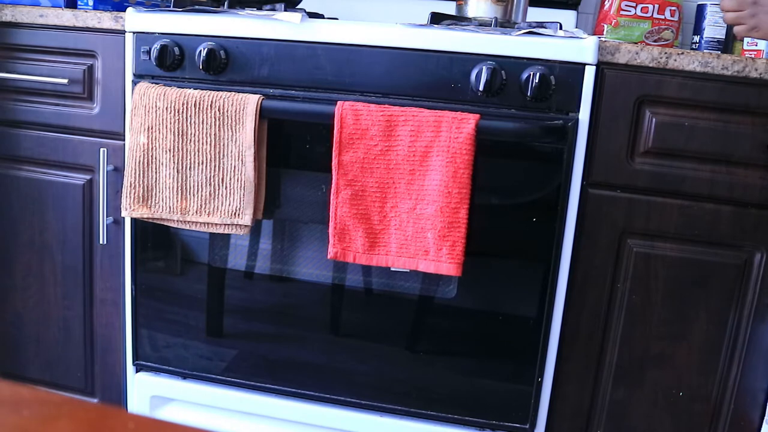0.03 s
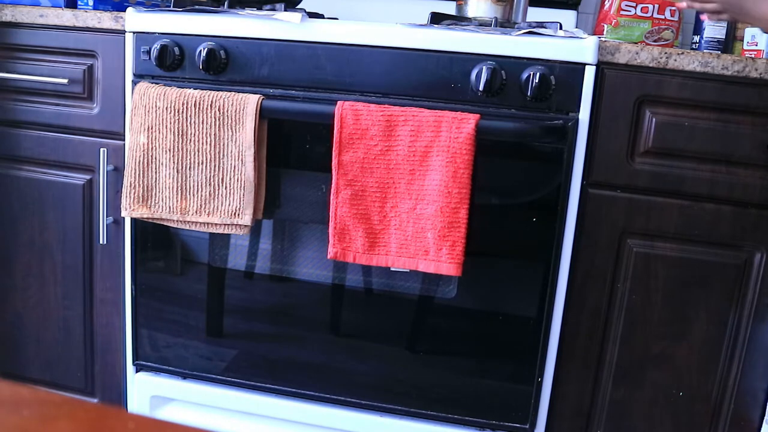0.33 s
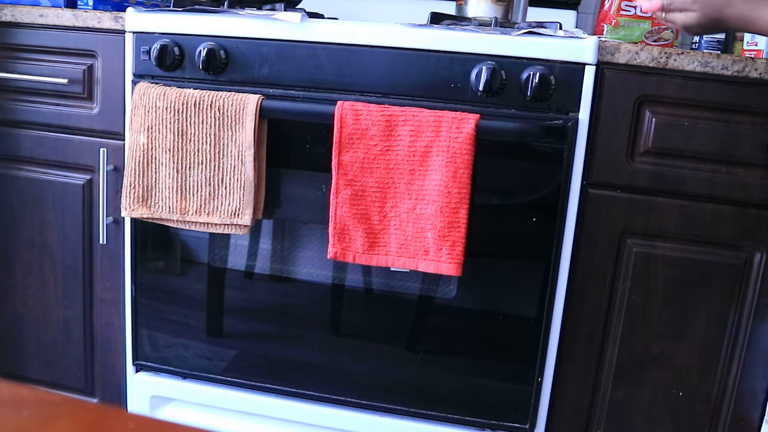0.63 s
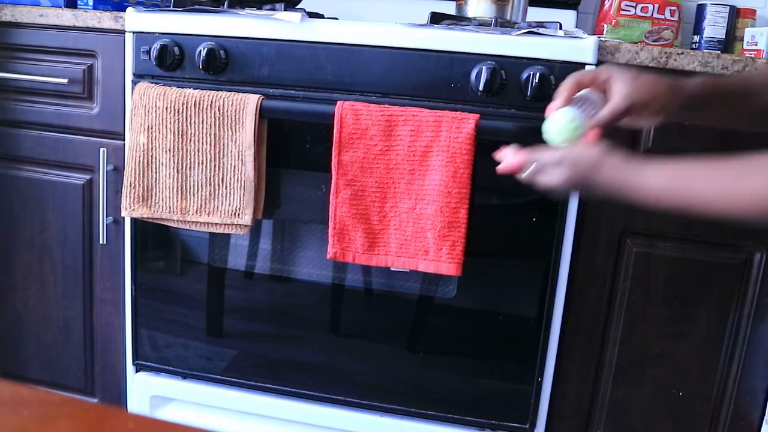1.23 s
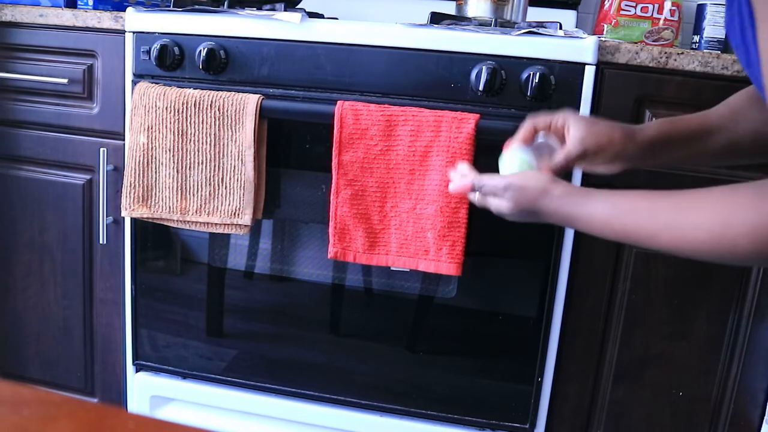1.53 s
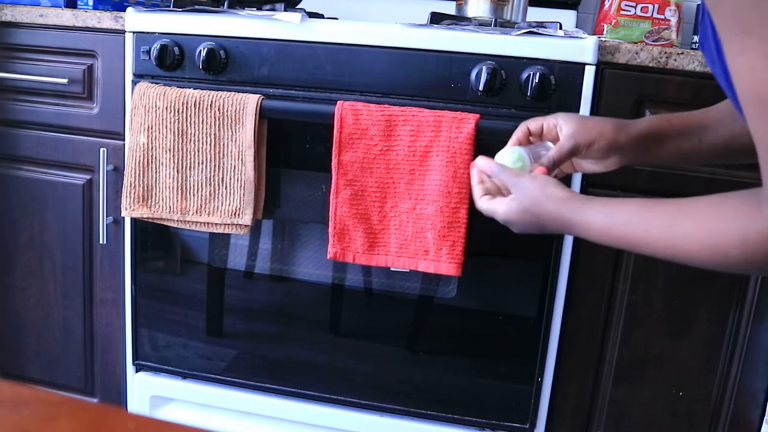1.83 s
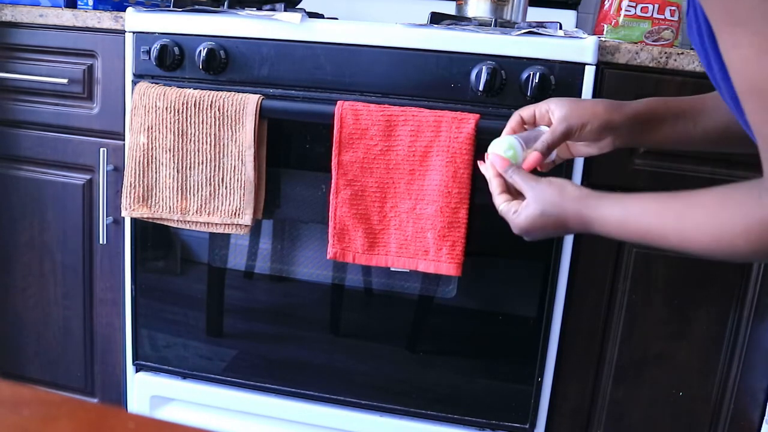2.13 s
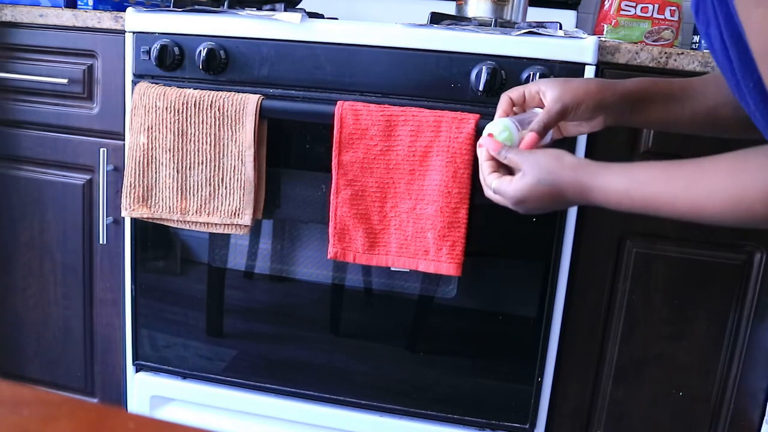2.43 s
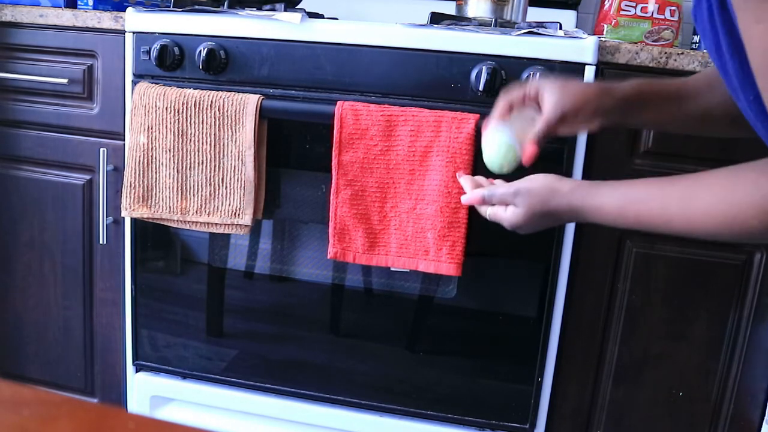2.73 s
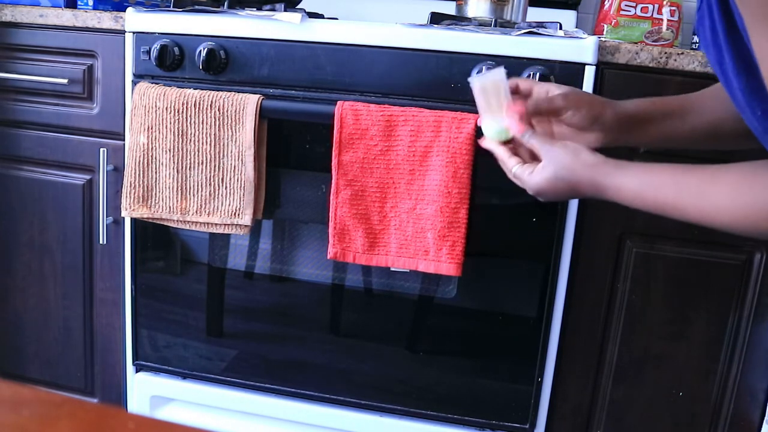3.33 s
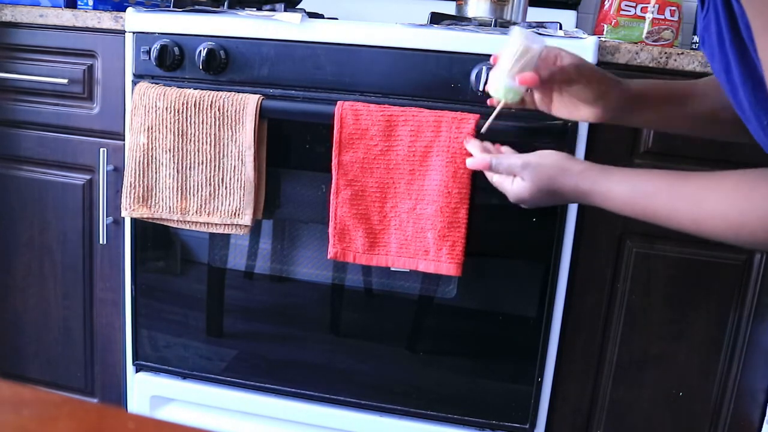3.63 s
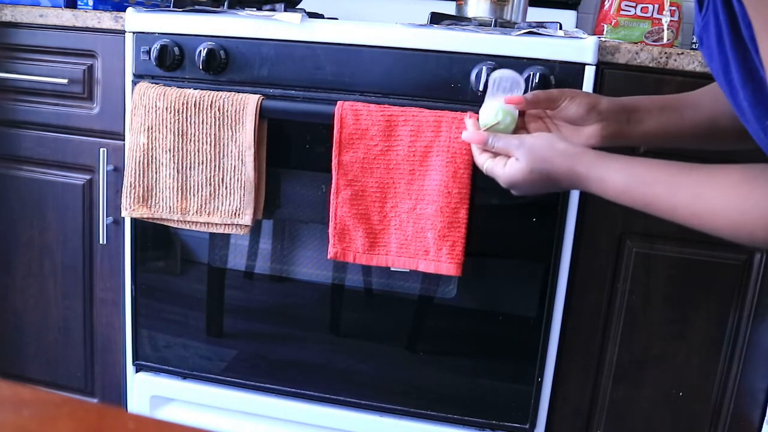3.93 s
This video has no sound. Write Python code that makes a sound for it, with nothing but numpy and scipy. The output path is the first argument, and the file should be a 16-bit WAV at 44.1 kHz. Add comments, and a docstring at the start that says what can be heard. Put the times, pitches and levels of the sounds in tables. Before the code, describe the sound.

Thin wooden sticks rattle in a small plastic container, starting with faint slides. Uneven, bright rattles and ticks follow from about 0.6 seconds, thickening between 1.5 and 1.8. After a lull, a sharp shake comes near 2.7 seconds, then more around 3.3 and 3.7, with sticks knocking against the container's end. Each rattle echoes briefly in the kitchen, over a quiet, steady rush of air and appliance hum.

```python
"""Thin wooden sticks rattle in a small plastic container, tipped and shaken by hand in a kitchen.
They slide over each other in swarms of tiny collisions, tick, and knock against the ends.
The sticks, the container wall and the air inside all ring. The hard room answers each rattle,
over a soft rush of air and the steady hum of an appliance."""
import sys
import numpy as np
from scipy import signal
from scipy.fft import rfft, irfft
from scipy.io import wavfile

SR = 44100
rng = np.random.default_rng(int(sys.argv[2]) if len(sys.argv) > 2 else 0)


def store_pcm(level_fs):
    """Save levels as 16-bit WAV."""
    pcm = np.round(np.clip(level_fs, -1, 1) * 32767).astype(np.int16)
    wavfile.write(sys.argv[1], SR, np.atleast_2d(pcm).T)


N = 176400

# tone of the room's rush: freq_hz, gain_db
RUSH_EQ = [(25, -33), (50, -20), (90, -14.5), (160, -7), (430, -1.5), (700, -9.5), (1900, -15),
           (2250, -24.5), (4900, -29), (10500, -43), (16000, -58)]
# stereo image of the rush: freq_hz, left_right_likeness
RUSH_LIKENESS = [(40, 1), (150, 0.82), (400, 0.052), (1000, 0.16), (3000, 0)]
# pan of the rush: freq_hz, left_minus_right_db
RUSH_PAN = [(60, -7), (180, -0.5), (550, 0)]
# partials of the appliance hum: pitch_hz, left_db, right_db, right_lag_rad
HUM_PARTIALS = [(80.7, -86, -77, 1), (120.2, -70, -78, 0), (201.3, -55.5, -69, 1), (240, -68, -72, 0),
                (360.3, -67, -65.5, .2), (402.8, -56, -62, .6)]
# the bundle slides, with sends relative to its level:
# peak_s, swell_s, level_db, stick_ring_db, air_ring_db, fizz_db
STICK_SLIDES = [(.077, 0.023, -60.5, -16, -15, 2), (.19, 0.06, -58, 4, -23, -21),
                (0.263, 0.04, -48.5, -0.5, -3, -12), (0.453, 0.024, -49, -8, 0.5, -16),
                (.587, 0.0094, -31.5, -2, -31, -16), (0.626, .038, -46, 6, -27, 1),
                (0.738, 0.051, -44.5, -1, -6, 4.5), (0.799, .035, -31.5, -12.5, -6, 4),
                (0.962, 0.15, -49, -1.5, -19, -18), (1.182, 0.032, -35, -11.5, -8, -1.5),
                (1.238, 0.023, -27.5, -2.5, -6.5, 5), (1.518, 0.018, -41.5, -3.5, 1, -1.5),
                (1.558, 0.022, -29.5, -0.5, -3.5, -2), (1.648, 0.032, -34.5, 3.5, 1, 3.5),
                (1.701, 0.032, -28, 1.5, 1.5, 2), (1.746, 0.014, -44.5, 11.5, -11, -13),
                (2.109, 0.051, -67, 11.5, -6, -18), (2.47, 0.042, -60, -2, -1.5, -5),
                (2.646, 0.038, -55.5, 3.5, -10, 0.5), (2.729, 0.016, -27.5, -1, 0.5, 5.5),
                (2.779, 0.011, -22.5, 0.5, -12, -1.5), (2.801, 0.0057, -38.5, -4, -15, 5),
                (3.14, 0.012, -54, -3, -11, -9), (3.271, 0.048, -49.5, 3.5, -19, -18),
                (3.355, 0.026, -34, 9.5, -6, -4.5), (3.409, 0.027, -31, -5, -3, -1),
                (3.584, 0.089, -47, -12, -25, -10), (3.692, .013, -32.5, 2.5, 1, 6.5),
                (3.717, 0.0066, -38, 15.5, -4, 7), (3.745, 0.011, -30, -3.5, 3, -9),
                (3.808, 0.012, -36, -28, -3, 4.5)]
# single dry ticks: start_s, level_db
DRY_TICKS = [(0.05, -58), (.376, -44.5), (.720, -36), (0.783, -34), (1.0999, -29), (1.353, -31),
             (2.614, -46), (2.7027, -39.5), (3.2243, -47), (3.230, -44.5), (3.41, -26), (3.572, -42.5),
             (3.736, -22.5), (3.807, -29.5)]
# sends of every tick: contact_db, fizz_db, stick_ring_db, air_ring_db, wall_db
TICK_SENDS = [1, -5, -7.5, -16, -59]
# sticks knock on the container's end, with sends relative to the level:
# start_s, level_db, stick_ring_db, air_ping_db, wall_db
END_KNOCKS = [(0.429, -40, 0, -12, -3), (1.538, -37, 6, 2, -10), (1.6042, -37.5, 18.5, 13.5, -20),
              (1.63, -32.5, 15.5, 6, -17), (1.687, -41, -2, -8, -26), (1.721, -28.5, 12.5, 7, -23),
              (1.732, -29, 13, 1, -19), (1.744, -37.5, 19, -8, -18), (2.5483, -45.5, 0, -4, -7),
              (2.7203, -26.5, 15, 10, -17), (2.767, -35, -2, 2, -10), (2.7728, -26, 11.5, 5.5, -5),
              (3.2548, -36.5, -4, -12, 6), (3.2888, -35, -1, -2, 2), (3.330, -35, -10, -10, 2),
              (3.3387, -37.5, 10, 13.5, 0), (3.6761, -26.5, 3, 15, 3), (3.6804, -24.5, 9.5, 16.5, 9.5),
              (3.6883, -30.5, 18, 17, -6)]
# tone of a bare contact: freq_hz, gain_db
CONTACT_EQ = [(150, -61), (500, -5.5), (1080, -4.5), (1450, -4.5), (2100, -0.5), (3300, -5), (4300, 1.5),
              (5400, 3), (7500, -6.5), (10000, -9.5), (13000, -32), (16000, -25)]
# tone of the fine scraping: freq_hz, gain_db
FIZZ_EQ = [(500, -43), (3500, -19.5), (6500, 6), (10000, 3), (13000, -4), (16000, -11.5)]
# tuning of the moving sticks and the enclosed air: time_s, stick_pitch_hz, spread_ratio, air_pitch_hz
RING_TUNING = [(.45, 2706, 0.23, 4780), (.56, 2386, 0.088, 4810), (1.25, 2393, .14, 4640),
               (1.702, 2459, 0.15, 4720), (2.747, 2450, .115, 4580), (3.35, 2451, 0.097, 4710),
               (3.691, 2467, .145, 4754)]
# modes of the container wall: pitch_hz, level_db, t60_s
WALL_MODES = [(1143, -16, .025), (1504, 6, 0.016), (1880, 12.5, 0.023), (2920, 8, 0.02), (3370, 7, 0.013),
              (4113, 16, 0.0057)]
# decay of the kitchen reverb: freq_hz, t60_s
REVERB_DECAY = [(200, 0.31), (1000, 0.41), (2400, 0.36), (5000, 0.36), (9000, 0.3), (15000, .16)]
# tone of the reverb: freq_hz, gain_db
REVERB_EQ = [(200, -9), (2400, 0.5), (6000, -3), (15000, -6)]
# stereo image of the reverb: freq_hz, left_right_likeness
REVERB_LIKENESS = [(200, 0.86), (1000, 0.53), (2400, -0.0043), (5000, -0.2), (12000, -0.24)]


def amp(db):
    """Decibels to gain."""
    return 10 ** (np.asarray(db) / 20)


def unit(x):
    """Scales to energy 1."""
    return x / np.sqrt(np.sum(x ** 2) + 1e-20)


def curve(points, hz):
    """Reads a table on a log-frequency axis."""
    freq_hz, value = np.transpose(points)
    return np.interp(np.log(hz + 1), np.log(freq_hz + 1), value)


def add(mix, start_s, sound):
    """Mixes a sound in at its start time."""
    part = mix[..., round(start_s * SR):][..., :sound.shape[-1]]
    part += sound[..., :part.shape[-1]]


def low_cut(x, hz):
    """Thins out the lows at 12 dB per octave."""
    return signal.sosfilt(signal.butter(2, hz, "high", fs=SR, output="sos"), x)


def colour(x, eq, size=2048):
    """Minimum-phase EQ: shapes clicks without smearing their attack."""
    log_gain = np.log(amp(curve(eq, abs(np.fft.fftfreq(size, 1 / SR)))))
    click = np.fft.ifft(np.exp(np.conj(signal.hilbert(log_gain)))).real
    return signal.oaconvolve(x, unit(click[:size // 2]))[:N]


def ring(x, modes, size=4096):
    """Rings a set of decaying modes with each click."""
    t = np.arange(size) / SR
    tone = sum(amp(db) * unit(np.cos(2 * np.pi * hz * t) / 1000 ** (t / t60)) for hz, db, t60 in modes)
    return signal.oaconvolve(x, unit(tone))[:N]


def stereo_pair(spectra, likeness):
    """Makes two unrelated spectra partly alike, narrowing the image."""
    left, other = spectra
    likeness = np.clip(likeness, -.99, .99)
    return np.array([left, likeness * left + np.sqrt(1 - likeness ** 2) * other])


def burst(decay_s, size=1024):
    """A snap of decaying noise with energy 1."""
    return unit(rng.standard_normal(size) * np.exp(-np.arange(size) / SR / decay_s))


def room_rush(level_db=-52):
    """A bed of steady, dark noise: the air of the room."""
    hz = np.fft.rfftfreq(N, 1 / SR)
    noise = stereo_pair(rfft(rng.standard_normal((2, N))), curve(RUSH_LIKENESS, hz))
    pan_db = np.outer([.5, -.5], curve(RUSH_PAN, hz))
    rush = irfft(noise * amp(curve(RUSH_EQ, hz) + pan_db), N)
    return amp(level_db) * unit(rush) * np.sqrt(2 * N)


def appliance_hum(waver_depth=.73, waver_hz=8.3):
    """A motor hums in a few partials, each wavering on its own."""
    t, hz, hum = np.arange(N) / SR, np.fft.fftfreq(N, 1 / SR), np.zeros((2, N))
    for pitch_hz, left_db, right_db, lag in HUM_PARTIALS:
        noise = rng.standard_normal(N) + 1j * rng.standard_normal(N)
        waver = np.fft.ifft(np.fft.fft(noise) * np.exp(-(hz / waver_hz) ** 2))
        tone = np.sqrt(2) * (1 + waver_depth * waver / waver.std()) * np.exp(2j * np.pi * pitch_hz * t)
        hum += [amp(left_db) * tone.real, amp(right_db) * (tone * np.exp(-1j * lag)).real]
    return hum


def slides(hits_per_s=1700, spread_db=5, settle_s=.0058):
    """Sticks slide over each other: swarms of uneven collisions swell, then settle at once."""
    strength = amp(spread_db * np.minimum(rng.exponential(1, N), 3)) * rng.choice([-1, 1], N)
    hits = unit(strength * (rng.random(N) < hits_per_s / SR))
    sends = np.zeros((5, N))  # contact, fizz, stick ring, air ring, wall
    t = np.arange(N) / SR
    for peak_s, swell_s, db, stick_db, air_db, fizz_db in STICK_SLIDES:
        span = slice(max(int((peak_s - 3 * swell_s) * SR), 0), int((peak_s + 6 * settle_s) * SR))
        from_peak = t[span] - peak_s
        envelope = np.exp(np.where(from_peak < 0, -(from_peak / swell_s) ** 2, -from_peak / settle_s))
        swarm = amp(db) * np.linalg.norm(envelope) * unit(envelope * hits[span])
        sends[:4, span] += np.outer(amp([0, fizz_db, stick_db, air_db]), swarm)
    return sends


def scattered_ring(hits, hz, spread, t60_s, reach_above=.6, count=28):
    """Each collision rings at a slightly different pitch, more often below hz than above."""
    pitch = hz * (1 + spread * rng.triangular(-1, 0, reach_above, N))
    bank_hz = np.linspace(pitch.min(), pitch.max(), count)
    struck = np.rint(np.interp(pitch, bank_hz, np.arange(count)))
    return sum(ring(hits * (struck == k), [(mode_hz, 0, t60_s)]) for k, mode_hz in enumerate(bank_hz))


def ticks(gain):
    """Single contacts snap dryly, with little ring."""
    sends = np.zeros((5, N))
    for start_s, db in DRY_TICKS:
        add(sends, start_s, np.outer(amp(TICK_SENDS), gain * amp(db) * burst(decay_s=.0016)))
    return sends


def knocks(gain, landing_s=.0018, ping_t60_s=.04):
    """Many sticks hit the end almost together and the enclosed air pings; returns sends and pings."""
    sends, pings, t = np.zeros((5, N)), np.zeros(N), np.arange(2048) / SR
    time_s, _, _, air_hz = np.transpose(RING_TUNING)
    for start_s, db, stick_db, ping_db, wall_db in END_KNOCKS:
        blow = gain * amp(db)
        landing = unit(low_cut(burst(landing_s), hz=1130))  # hard tips land with little low body
        add(sends, start_s, np.outer([1, 0, amp(stick_db), 0, amp(wall_db)], blow * landing))
        tone = np.sin(2 * np.pi * (np.interp(start_s, time_s, air_hz) * t + rng.random()))
        envelope = (1 - np.exp(-t / landing_s)) / 1000 ** (t / ping_t60_s)
        add(pings, start_s, blow * amp(ping_db) * unit(tone * envelope))
    return sends, pings


def container(blow_s=.0023):
    """Slides, ticks and knocks excite the sticks, air and wall; returns the rattle and the pings."""
    hit_gain = np.sqrt(blow_s * SR)  # a hit carries the energy of its level held for blow_s
    slide_sends = slides()
    knock_sends, pings = knocks(hit_gain)
    contact, fizz, sticks, air, wall = slide_sends + ticks(hit_gain) + knock_sends
    time_s, *tuning = np.transpose(RING_TUNING)
    stick_hz, stick_spread, air_hz = (np.interp(np.arange(N) / SR, time_s, track) for track in tuning)
    rattle = colour(contact, CONTACT_EQ) + colour(fizz * rng.choice([-1, 1], N), FIZZ_EQ)
    rattle += ring(wall, WALL_MODES)
    rattle += scattered_ring(sticks, stick_hz, stick_spread, t60_s=.038)
    rattle += scattered_ring(air, air_hz, spread=.13, t60_s=.021)  # sliding sticks lower the air's ring
    return low_cut([rattle, pings], hz=550)  # the rattle and pings are thinned below 550 Hz


def kitchen(direct, send, direct_db=-6.5, left_db=-1.5, left_lag_s=.000026, early_db=3.5, early_s=.0058):
    """Direct sound from right of centre, dense first reflections and a diffuse tail off hard walls."""
    t = np.arange(32768) / SR
    hz, frame_s, noise = signal.stft(rng.standard_normal((2, t.size)), SR, nperseg=256)
    hz = hz[:, None]
    t60 = curve(REVERB_DECAY, hz)
    wash = stereo_pair(noise, curve(REVERB_LIKENESS, hz)) * amp(curve(REVERB_EQ, hz))
    decay = np.sqrt(2 * np.log(1000) / (t60 * SR)) / 1000 ** (frame_s / t60)  # equal energy per band
    tail = signal.istft(wash * decay, SR, nperseg=256)[1][:, :t.size]
    tail *= np.minimum(t / .0025, 1)  # soft onset
    tail *= np.sqrt(1 + amp(early_db) * np.exp(-t / early_s))  # bounces off the hands and the oven door
    reverb = signal.fftconvolve(send[None], tail, axes=1)[:, :N]
    left = irfft(rfft(direct) * np.exp(-2j * np.pi * np.fft.rfftfreq(N, 1 / SR) * left_lag_s), N)
    return (amp(direct_db) * np.array([left, direct]) + reverb) * amp([[left_db], [0]])


def scene(ping_direct_db=5.5, ping_send_db=-8.5):
    """The rattle in the humming kitchen."""
    rattle, pings = container()
    # the pings beam out of the container's end: more direct sound, less room
    direct = rattle + amp(ping_direct_db) * pings
    send = rattle + amp(ping_send_db) * pings
    return room_rush() + appliance_hum() + kitchen(direct, send)


def record(dry, cutoff_hz=15900):
    """A steep high cut takes the very top off the mix."""
    high_cut = signal.firwin(511, cutoff_hz, window=("kaiser", 9), fs=SR)
    return signal.oaconvolve(dry, high_cut[None], "same")


dry = scene()
out = record(dry)
store_pcm(out)
```